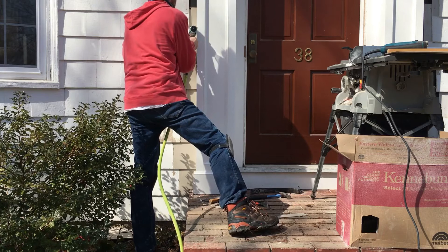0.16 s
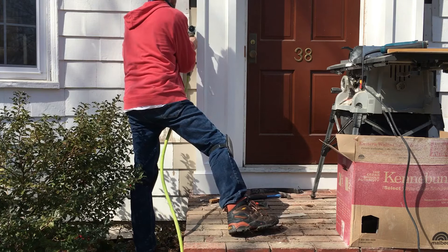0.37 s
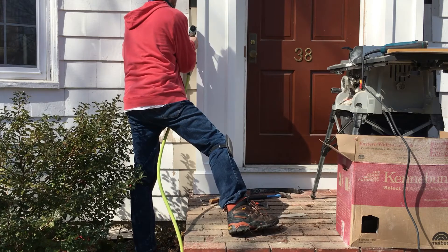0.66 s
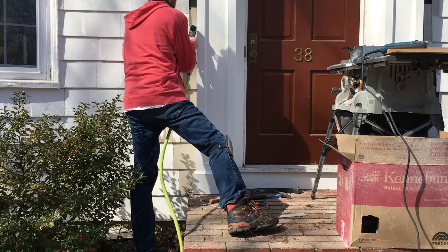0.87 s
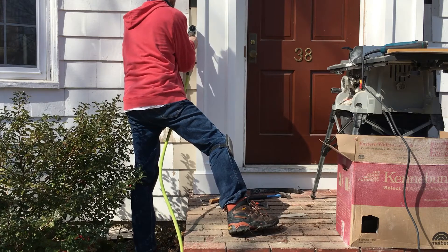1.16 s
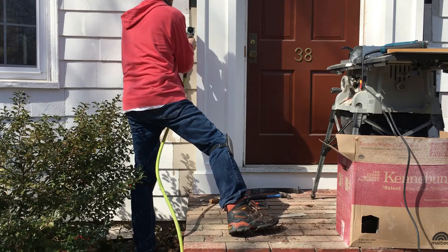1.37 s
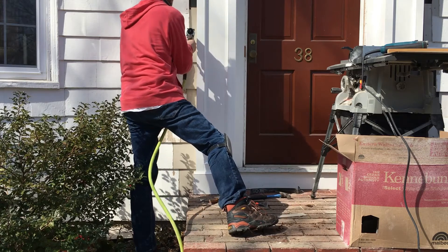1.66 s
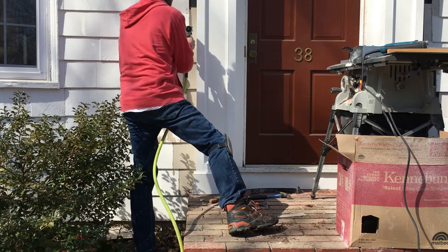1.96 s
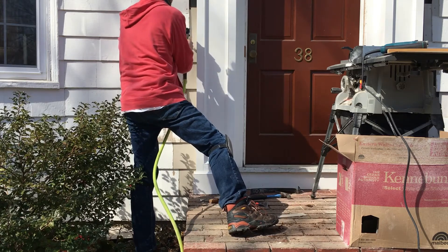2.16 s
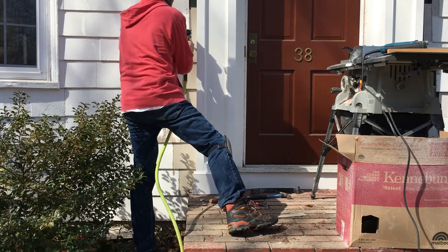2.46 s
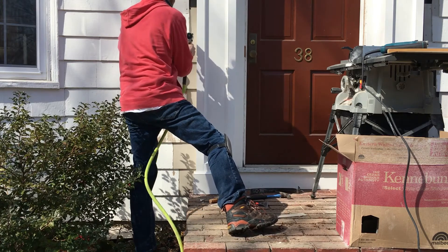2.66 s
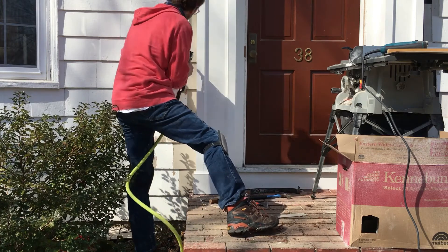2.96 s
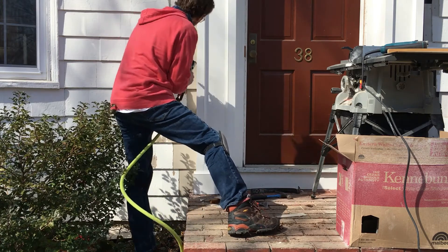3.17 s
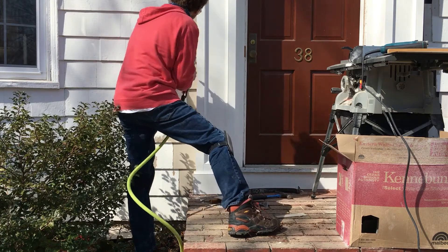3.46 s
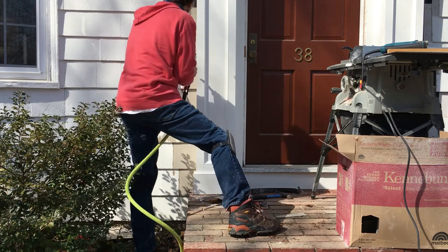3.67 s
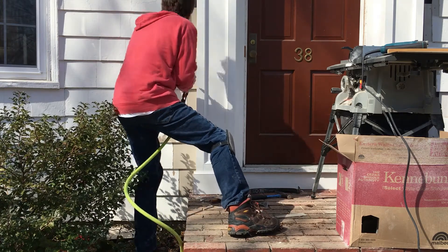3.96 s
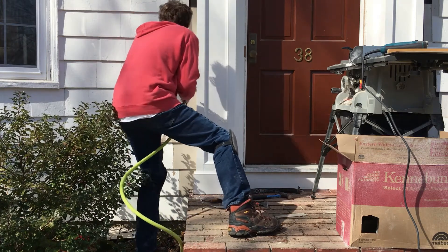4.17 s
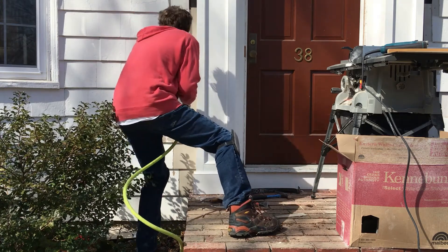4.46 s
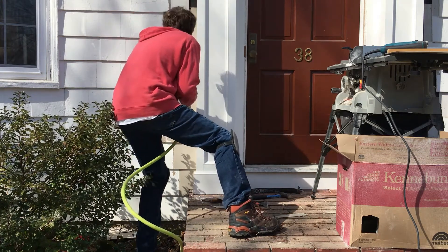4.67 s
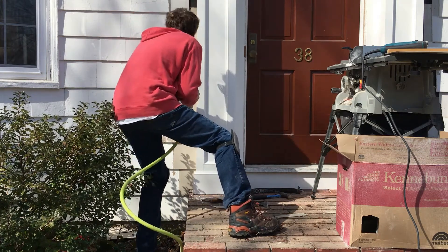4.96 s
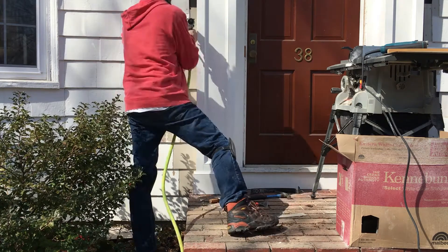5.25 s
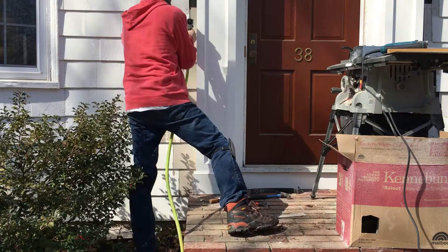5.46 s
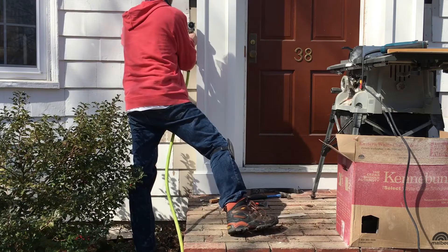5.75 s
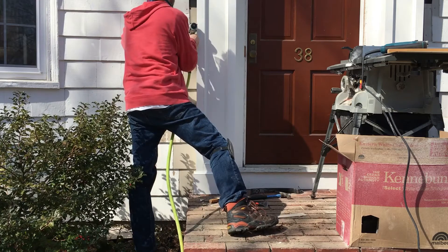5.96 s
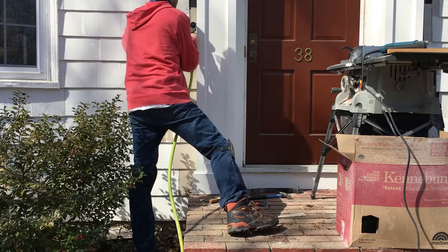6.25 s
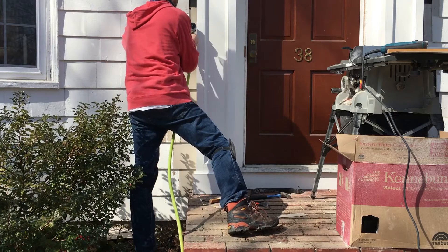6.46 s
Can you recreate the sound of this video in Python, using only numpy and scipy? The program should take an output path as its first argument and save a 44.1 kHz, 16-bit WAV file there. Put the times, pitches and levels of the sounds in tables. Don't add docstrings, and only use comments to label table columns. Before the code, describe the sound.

A few metres from a phone microphone, an air nailer fires into wooden siding: a loud ringing pop and crack, then a tenth of a second later an exhaust blast and hiss, echoing across the street. Clothes rustle and the tool taps wood during a long gap with faint bird whistles and low traffic, before a second similar shot near the end.

```python
import sys
import numpy as np
from scipy import signal
from scipy.fft import rfft, irfft
from scipy.io import wavfile
from scipy.ndimage import uniform_filter1d

SR = 44100
rng = np.random.default_rng(int(sys.argv[2]) if len(sys.argv) > 2 else 0)


def volts(x):
    e = np.asarray(x, float) / 20
    return 10 ** e


def master(y):
    cut = np.clip(np.atleast_2d(y).T, -1, 1)
    pcm = np.round(cut * 32767)
    wavfile.write(sys.argv[1], SR, pcm.astype(np.int16))


N = 291942
T = np.arange(N) / SR

# (frequency [Hz], level [dB per Hz])
TOWN_COLOUR = [(15, -45.5), (28, -26.5), (50, 1), (100, -2.5), (170, -9.5), (240, -13), (420, -19.5),
               (800, -23), (1400, -27.5), (2000, -36.5), (3000, -43), (5000, -53), (8000, -59),
               (16000, -66)]
TOWN_DB = -45.5
# (time [s], level [dB])
TRAFFIC_LOAD = [(0.0, -52.5), (0.5, -53), (0.94, -48), (1.4, -51), (2.65, -47), (3.76, -52), (3.98, -49),
                (5.0, -50.5), (5.24, -45.5), (5.44, -46), (5.92, -46.5), (6.07, -46), (6.4, -48),
                (6.62, -51.5)]
# (time [s], length [s], start [Hz], end [Hz], level [dB])
ENGINES = [
    (2.05, .5, 122, 115, -51),
    (3.35, 1.4, 172, 162, -50),
    (4.95, .55, 63, 58, -42),
    (5.05, .6, 122, 120, -52),
    (4.6, .8, 235, 228, -60),
]

# (time [s], level [dB], wait before steps [s], first loud step [Hz], key of the drop [ratio])
WHISTLES = [
    (4.049, -59, .266, 2000, 1.03),
    (4.604, -55.5, .187, 2010, .97),
]
# (time after start [s], frequency [Hz], level [dB])
WHISTLE_DROP = [(0, 4150, -16), (.005, 3500, -7), (.012, 3230, -3), (.031, 3130, 0), (.043, 2620, -2),
                (.066, 2290, 0), (.082, 2250, -2), (.095, 2230, -22)]
STEP_S, THROB_FLOOR, STEP_FALL_HZ = .054, .15, 90
STEP_DB, STEP_FADE_DB, STEP_SOFT_DB = -1, -.65, -12
# (time [s], frequency [Hz], level [dB])
TRILL = [(1.722, 5130, -65), (1.808, 5160, -63.5), (1.893, 5000, -69), (1.98, 5100, -64),
         (2.065, 4850, -66.5), (2.152, 4950, -62.5), (2.241, 4930, -60.5), (2.333, 5010, -61)]
# (time [s], length [s], start [Hz], end [Hz], level [dB])
CHIRPS = [(3.143, 0.048, 7200, 7300, -78.5), (3.553, .07, 6340, 6440, -80), (4.3, .065, 7320, 7200, -80),
          (5.145, 0.12, 7070, 7160, -73), (5.444, 0.077, 7300, 7600, -82), (5.602, 0.086, 6450, 6450, -85),
          (6.017, 0.02, 3900, 3770, -66), (6.021, .02, 2540, 2500, -62), (2.15, 0.13, 6800, 6700, -86)]
FAR_HOUSE_S, FAR_HOUSE_DB = .197, -18

# (time [s], middle part [dB], dull part [dB], bright part [dB], porch tail [dB])
TAPS = [(0.11, -70, -58, -82, -10), (0.2165, -52, -67, -62.5, -19), (0.2813, -56, -49, -63, 3.5),
        (0.569, -57, -68, -68, 0.5), (1.807, -56, -61, -65.5, -5), (2.5614, -59, -59.5, -66, -6),
        (2.613, -52, -57, -59, -8), (2.6493, -40, -39, -57, -9), (2.828, -51, -52, -59.5, -13),
        (3.032, -48, -59.5, -64.5, -11.5), (3.1674, -65, -55, -69, -8.5), (4.99, -54.5, -50, -67.5, -6),
        (5.4131, -61, -61, -78, -8), (5.5353, -51.5, -43.5, -61, 2), (5.6825, -43, -39, -62, 0),
        (5.8394, -76, -65, -82, 10)]
# (time [s], frequency [Hz], level [dB])
PINGS = [(5.531, 1300, -46), (5.545, 1500, -49), (3.68, 5200, -66), (3.92, 6400, -64), (2.566, 6400, -67),
         (2.705, 6300, -63), (2.73, 5400, -62), (2.77, 7200, -64), (3.34, 11800, -68.5), (3.37, 7800, -64),
         (4.44, 6500, -68.5), (5.99, 9700, -69.5)]
# (time [s], length [s], level [dB], fuller rub above dry rub [dB])
MOVES = [(2.5, 0.71, -87.5, 3.5), (3.4, 0.76, -92, 1.5), (5.0, .5, -97, 0), (2.478, 0.077, -79.5, 0.5),
         (2.555, 0.11, -74.5, -3), (2.69, 0.067, -80, 4), (2.76, .08, -76.5, 4), (2.86, 0.16, -88, 10),
         (3.04, 0.066, -72.5, -5), (3.11, 0.067, -81, -4), (3.2, .08, -85, 2), (3.29, .09, -82, 0.5),
         (3.473, 0.022, -76, -6), (3.535, .015, -79.5, -6), (3.685, .04, -81, 0), (3.78, 0.081, -80, -1),
         (3.89, .05, -71, 0), (3.96, .1, -77.5, -0.5), (4.082, .12, -84, -3), (4.427, .03, -83, 3),
         (5.005, 0.051, -82, 7), (5.05, 0.043, -73.5, 5), (5.14, .03, -82, 0), (5.367, .05, -86, 1)]
RUB_RISE_S, RUB_T60_S, STILL_DB, SHAKE_DB, SHAKE_T60_S = 0.014, 0.11, -92.5, -6, 0.073
# (time [s], level [dB])
SNAPS = [(2.7596, -61), (2.828, -53), (3.032, -54), (3.0645, -51.5), (3.1677, -57), (3.2969, -65),
         (3.3708, -63), (3.478, -66), (3.6985, -63), (3.7873, -63.5), (3.8302, -52), (3.8606, -54),
         (3.8896, -55.5), (3.91, -57), (3.9639, -60), (4.0442, -57)]

# (frequency [Hz], level [dB per Hz])
STREET_COLOUR = [(450, -27), (800, -0.5), (2000, -1), (4000, -8.5), (8000, -20), (11000, -31), (14000, -56)]
STREET_NEAR_DB, STREET_HOLD_S, STREET_NEAR_T60_S = -44, .1, .15
STREET_FAR_DB, STREET_FAR_T60_S = -55, 1.2
SLAP_S, SLAP_DB, SLAP_HOLD_S, SLAP_T60_S = .225, -55, .035, .13
# (frequency [Hz], level [dB per Hz])
HISS_COLOUR = [(710, -30.5), (1200, -1.5), (1440, -3.5), (4260, -8), (8530, -6.5), (10500, -11.5),
               (14200, -12), (16000, -18.5)]
LEAK_DB, LEAK_RISE_S = -54, .02
BLEED_DB, BLEED_T60_S = -40.5, .55
SEEP_DB, VALVE_SHUT_S, SHUT_T60_S = -56.5, .28, .15

# (fire time [s], release time [s])
SHOTS = [
    (0.9136, 1.0424),
    (6.1249, 6.2242),
]
# (pop [dB], ring [dB], crack [dB], blast [dB], puff [dB])
FORCE = [
    (0, -11.5, -14.5, -12, -9.5),
    (-1.5, -11, -13, -13, -20),
]
STROKE_S, VENT_S = .0062, .0036
# (frequency [Hz], level [dB], t60 [s])
POP_MODES = [(1477.4, 1, .018), (2300, -9, 0.015), (2970, -11.5, .01), (470, -11.5, .03), (1170, -9, .014),
             (770, -12.5, 0.014)]
# (frequency [Hz], level [dB], t60 [s])
BODY_MODES = [(212, -16.5, .06), (310, -19.5, 0.058), (400, -16, .045), (495, -13.5, 0.027),
              (694, -14, 0.016), (970, -17.5, 0.018), (1170, -8.5, 0.048), (1226, -6, .018),
              (1379, -2.5, 0.018), (1536, 0.5, 0.015), (1630, 0, 0.0082), (1960, -9.5, 0.02),
              (2290, -7.5, 0.0096), (2850, -11.5, 0.029), (3020, -10, .014), (3360, -11.5, 0.0076)]
# (frequency [Hz], level [dB], t60 [s])
LATCH_MODES = [(1150, -6, 0.025), (1700, -1, .012), (2500, -1.5, .012), (3200, -6, 0.01)]
# (delay after release [s], level [dB])
PISTON_RETURN = [
    (0, -11),
    (.0075, -20.5),
    (.027, -13),
    (0.035, -14.5),
]
# (delay [s], level [dB])
WALLS = [(.0038, -3), (.0085, -4), (0.0108, -2), (.014, -1), (0.018, -6), (.0222, -10), (.031, -14.5)]
# (frequency [Hz], level [dB per Hz])
CRACK_COLOUR = [(2060, -27), (3500, 0), (5130, -7.5), (6090, -1.5), (7410, -9), (8580, -4), (10500, -11.5),
                (16000, -13.5)]
# (frequency [Hz], level [dB per Hz])
BLAST_COLOUR = [(88, -23), (150, -4), (400, -7), (662, -13.5), (979, -12), (1900, -11), (2550, -13.5),
                (4600, -16.5), (10400, -16.5), (11500, -14.5), (16000, -16.5)]


def colour(table, x=None):
    hz, db = np.transpose(table)
    f = np.maximum(np.fft.rfftfreq(N, 1 / SR), 1)
    x = rng.standard_normal(N) if x is None else x
    gain = volts(np.interp(np.log(f), np.log(hz), db, left=-120, right=-120))
    y = irfft(rfft(x) * gain, N)
    return y / np.sqrt(np.mean(y ** 2))


def band(lo_hz, hi_hz, x=None):
    return colour([(lo_hz / 1.7, -30), (lo_hz, 0), (hi_hz, 0), (hi_hz * 1.3, -30)], x)


def walk(rate):
    k = int(SR / rate)
    held = np.repeat(rng.standard_normal(N // k + 1), k)
    return 1.7 * uniform_filter1d(uniform_filter1d(held, k), k)[:N]


def swell(s, rise, hold, t60):
    t = np.maximum(T - s, 0)
    fall = np.exp(np.minimum((t - hold) * np.log(1000) / t60, 60))
    return (1 - np.exp(-t / rise)) / (1 + fall)


def ring(modes):
    t = T[:SR // 4]
    y = 0
    for k, (hz, db, t60) in enumerate(modes):
        y = y + (-1) ** k * volts(db) * np.sin(2 * np.pi * hz * t) * 1000 ** (-t / t60)
    return y / np.abs(y).max()


def porch(wet_db, rise, hold, t60, direct=1):
    y = np.zeros(N)
    y[rng.integers(40, SR // 10, 400)] = rng.choice([-1., 1.], 400)
    y *= volts(wet_db) * swell(0, rise, hold, t60)
    y[0] = direct
    return y[:SR // 10]


def blows(times, db, response):
    x = np.zeros(N)
    x[(np.asarray(times) * SR).astype(int)] = volts(db)
    return signal.fftconvolve(x, response)[:N]


def glide(s, length, hz0, hz1, db, wobble):
    share = np.clip((T - s) / length, 0, 1)
    turns = np.cumsum((hz0 + (hz1 - hz0) * share) * (1 + wobble)) / SR
    return volts(db) * np.sin(np.pi * share) * np.sin(2 * np.pi * turns)


def town():
    out, base = 0, rfft(colour(TOWN_COLOUR))
    octave = np.log2(np.maximum(np.fft.rfftfreq(N, 1 / SR), 1) / 32)
    s, load_db = np.transpose(TRAFFIC_LOAD)
    rumble = np.interp(T, s, load_db + 49.5) + 1.5 * walk(8)
    drone = .8 * walk(9)
    for k in range(10):
        db = rumble if k < 2 else drone if k < 4 else 0.23 * drone
        share = np.clip(1 - np.abs(octave - k), 0, 1)
        out += volts(db + 1.0 * walk(7)) * irfft(base * share, N)
    return out * volts(TOWN_DB)


def engines():
    return volts(4.2 * walk(14)) * sum(glide(*note, 0.022 * walk(10)) for note in ENGINES)


def whistle(s, db, wait, step_hz, key, flutter):
    after, hz, drop_db = np.transpose(WHISTLE_DROP)
    drop_turns = np.cumsum(key * np.interp(T - s, after, hz) * (1 + flutter)) / SR
    drop_gain = volts(db + np.interp(T - s, after, drop_db, left=-99, right=-99))
    drop = drop_gain * np.sin(2 * np.pi * drop_turns)
    beats = (T - s - wait) / STEP_S
    sink_hz = np.clip(step_hz - STEP_FALL_HZ * beats, 500, 5000)
    sink_turns = np.cumsum(sink_hz * (1 + flutter / 2)) / SR
    throb = THROB_FLOOR + (1 - THROB_FLOOR) * np.abs(np.sin(np.pi * beats))
    level_db = np.where(beats < 0, STEP_SOFT_DB, STEP_DB + STEP_FADE_DB * beats ** 2)
    started = T - s > after[-2]
    return drop + started * throb * volts(db + level_db) * np.sin(2 * np.pi * sink_turns)


def birds():
    out, flutter, scratch = 0, walk(120), walk(500)
    out += volts(0.5 * walk(60)) * sum(whistle(*call, .012 * flutter) for call in WHISTLES)
    for s, hz, db in TRILL:
        out += glide(s - .03, .03, .92 * hz, 1.04 * hz, db - 6, .028 * scratch)
        out += glide(s - .006, 0.018, 1.03 * hz, .98 * hz, db - 1.5, .018 * scratch)
    out += volts(2.2 * flutter - 3.0) * sum(glide(*note, .012 * scratch) for note in CHIRPS)
    echo = rng.standard_normal(SR // 4) * 1000 ** (-T[:SR // 4] / 0.34)
    gardens = volts(-33.5) * signal.fftconvolve(out, echo)[:N]
    far_house = volts(FAR_HOUSE_DB) * np.roll(out, int(FAR_HOUSE_S * SR))
    return out + gardens + far_house


def taps():
    out, mid, dull, bright = 0, band(2200, 6970), band(860, 2570), band(9900, 13500)
    for s, db, dull_db, bright_db, tail_db in TAPS:
        shape = swell(s, 0.00026, 0.0023, 0.01) + volts(tail_db) * swell(s, 0.0057, 0.0076, 0.059)
        knock = volts(db) * mid + volts(dull_db + 0.5) * dull + volts(bright_db) * bright
        out += shape * volts(-6.5) * knock
        out += blows([s], dull_db - 3, ring(LATCH_MODES))
    return out


def clothes():
    out = sum(blows([s], db, ring([(hz, 0, .02), (1.13 * hz, -4, .012)])) for s, hz, db in PINGS)
    out += band(7000, 15000) * sum(volts(db - 3) * swell(s, .0002, 0.00092, .006) for s, db in SNAPS)
    catches = (rng.random((2, N)) < .012) * volts(3.2 * rng.exponential(size=(2, N))) * 2.5
    grains = catches + rng.standard_normal((2, N))
    catch = 1.1 * walk(110)
    shakes = sum(volts(tap[3] + SHAKE_DB) * swell(tap[0], .002, .004, SHAKE_T60_S) for tap in TAPS)
    dry_rub = full_rub = volts(STILL_DB) + shakes
    for s, length, db, full_db in MOVES:
        rub = volts(db) * swell(s, RUB_RISE_S, length, RUB_T60_S)
        dry_rub = dry_rub + rub
        full_rub = full_rub + rub * volts(full_db)
    out += band(9500, 15000, grains[0]) * dry_rub * volts(catch + 1.2 * walk(40))
    return out + band(5500, 9000, grains[1]) * full_rub * volts(catch + 1.1 * walk(37))


def street_echo():
    level = 0
    for fire, release in SHOTS:
        slap = release + SLAP_S
        level += volts(STREET_NEAR_DB) * swell(fire, 0.015, STREET_HOLD_S, STREET_NEAR_T60_S)
        level += volts(STREET_FAR_DB) * swell(slap, 0.033, 0, STREET_FAR_T60_S)
        level += volts(SLAP_DB) * swell(fire + SLAP_S, 0.014, SLAP_HOLD_S, SLAP_T60_S)
        level += volts(SLAP_DB) * swell(slap, 0.0067, SLAP_HOLD_S, SLAP_T60_S)
    return level * volts(3.0 + 1.5 * walk(70)) * colour(STREET_COLOUR)


def air_hiss():
    level = 0
    for fire, release in SHOTS:
        level += volts(LEAK_DB) * swell(fire, LEAK_RISE_S, release - fire, .05)
        level += volts(BLEED_DB) * swell(release, .02, 0, BLEED_T60_S)
        level += volts(SEEP_DB) * swell(release, .05, VALVE_SHUT_S, SHUT_T60_S)
        level += volts(SLAP_DB - 3) * swell(release + SLAP_S, .01, SLAP_HOLD_S, SLAP_T60_S)
    return level * volts(3.0 + .8 * walk(90)) * colour(HISS_COLOUR)


def nailer():
    out, crack, blast = 0, colour(CRACK_COLOUR), colour(BLAST_COLOUR)
    grit = volts(2.0 * walk(900))
    knock_delay, knock_db = np.transpose(PISTON_RETURN)
    wall_delay, wall_db = np.transpose(WALLS)
    pop = ring(POP_MODES) * (1 - np.exp(-T[:SR // 4] / 0.0005)) ** 2
    body, latch = ring(BODY_MODES), ring(LATCH_MODES)
    for (fire, release), (pop_db, ring_db, crack_db, blast_db, puff_db) in zip(SHOTS, FORCE):
        home, vent = fire + STROKE_S, release + VENT_S
        trigger_air = blast + 1.5 * colour(STREET_COLOUR)
        out += trigger_air * grit * volts(-57) * swell(fire - .022, .03, .015, .02)

        out += blows([fire], pop_db + 4.5, pop)
        body_on_porch = signal.fftconvolve(body, porch(-14.0, 0.0054, .016, .07, direct=0))
        out += blows([fire], ring_db, body_on_porch)
        out += blows(fire + wall_delay, ring_db + wall_db + 3.5, body)

        crack_shape = swell(home, .006, .012, 0.045) + .13 * swell(fire, 0.00092, .024, 0.11)
        out += crack * grit * volts(crack_db) * crack_shape
        out += crack * volts(crack_db + 2) * swell(home, 0.00028, 0.00027, .004)

        latch_on_porch = signal.fftconvolve(latch, porch(-12.5, .003, .008, 0.032))
        out += blows(release + knock_delay, knock_db, latch_on_porch)
        blast_shape = swell(vent, 0.00071, 0.015, 0.071) + .12 * swell(vent, .003, 0.02, .13)
        blast_shape += .04 * swell(release, 0.00038, 0.0063, 0.017)
        out += blast * grit * volts(blast_db) * blast_shape

        puff = vent + .0018
        t = np.maximum(T - puff, 0)
        turns = 42 * t + 0.85 * (1 - np.exp(-t / .006))
        out += volts(puff_db) * np.sin(2 * np.pi * turns) * swell(puff, 0.0013, .012, 0.078)
    return out


def scene():
    background = town() + engines() + birds()
    close = taps() + clothes()
    shots = street_echo() + air_hiss() + nailer()
    return (background + close + shots)[None]


def band_limit(x):
    return signal.sosfilt(signal.butter(12, 16970, fs=SR, output="sos"), x)


def record(dry):
    mix = 1.146 * np.tanh(dry / 1.049)
    return band_limit(mix)


dry = scene()
out = record(dry)
master(out)
```